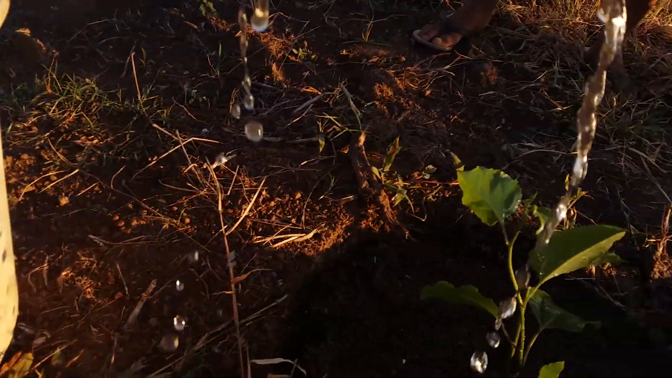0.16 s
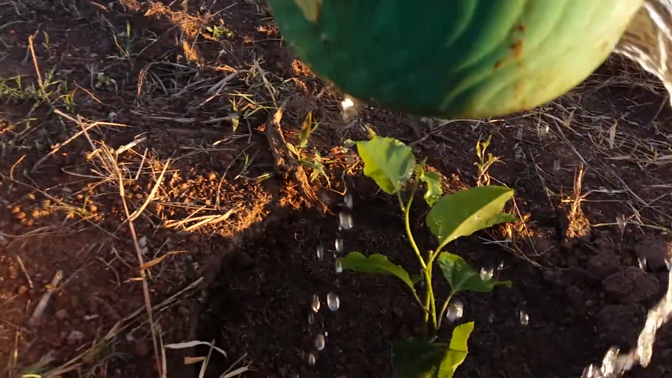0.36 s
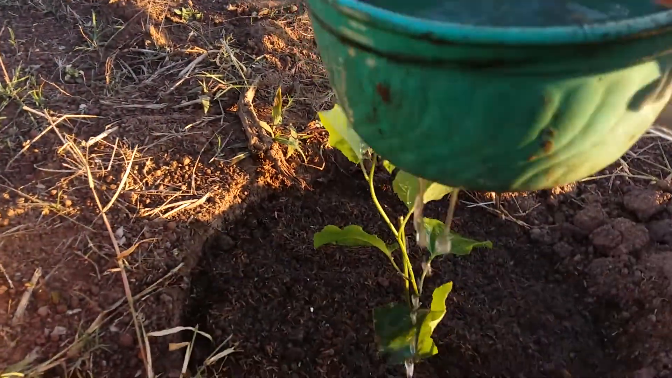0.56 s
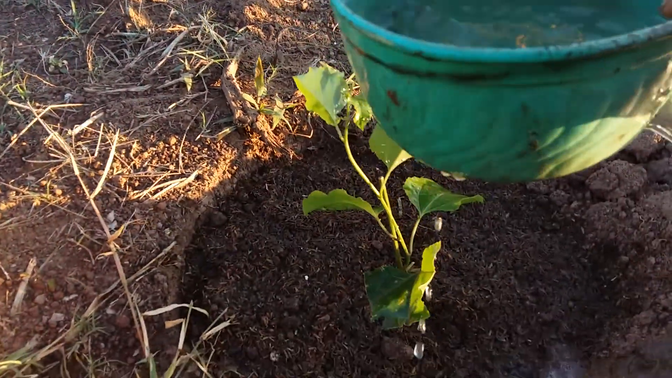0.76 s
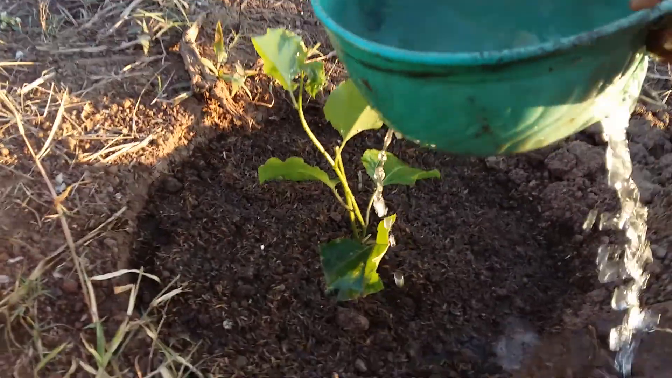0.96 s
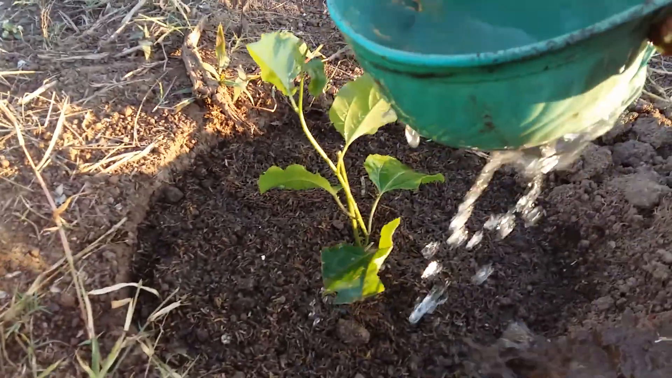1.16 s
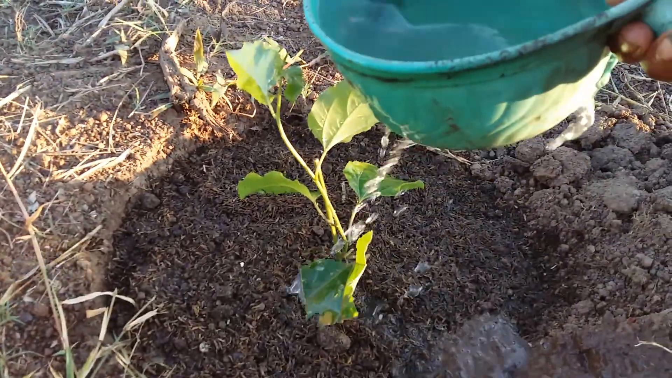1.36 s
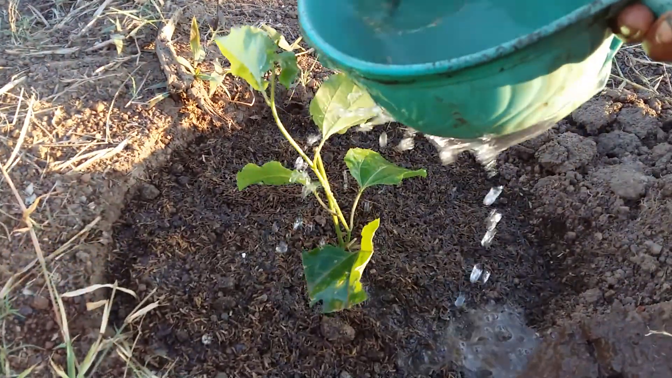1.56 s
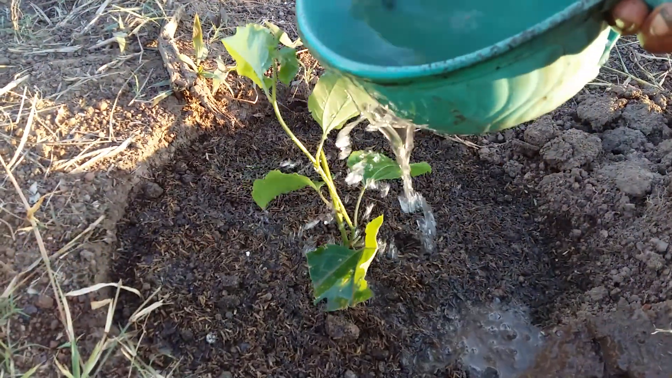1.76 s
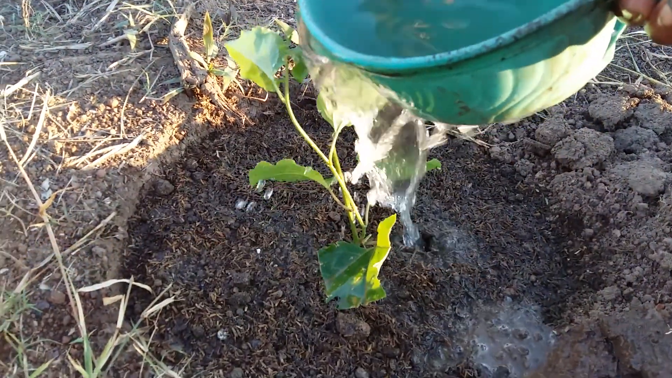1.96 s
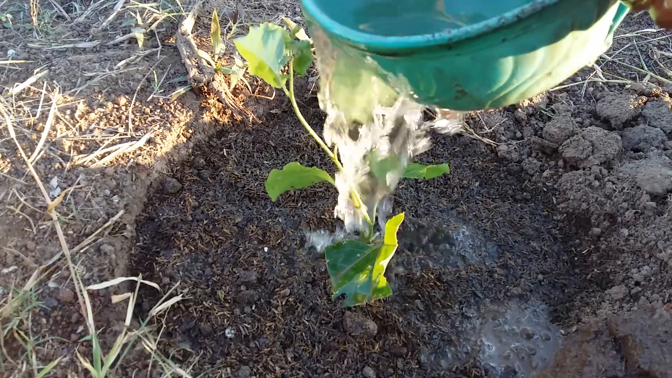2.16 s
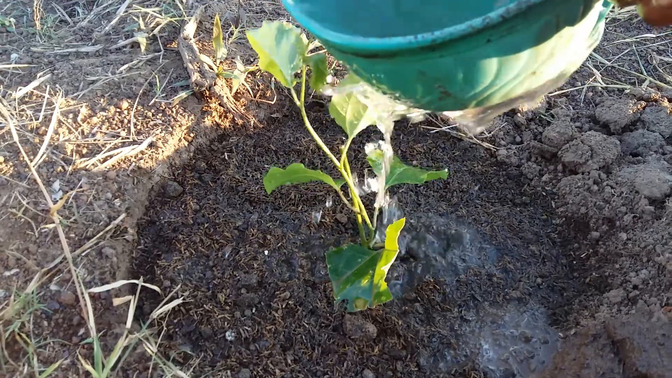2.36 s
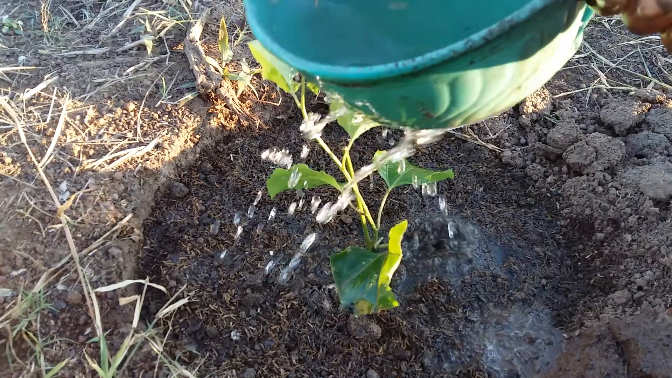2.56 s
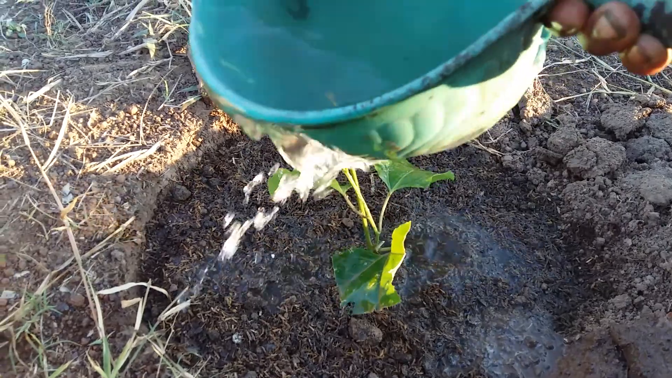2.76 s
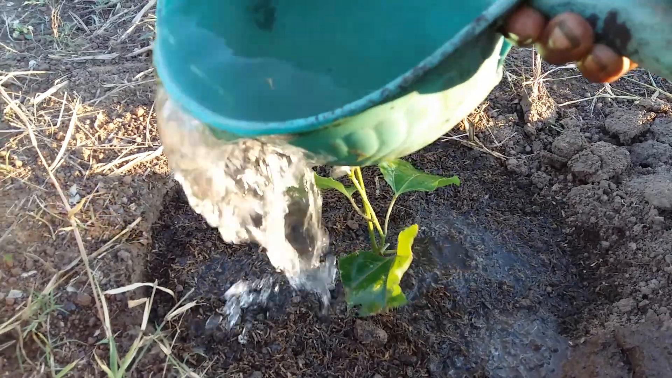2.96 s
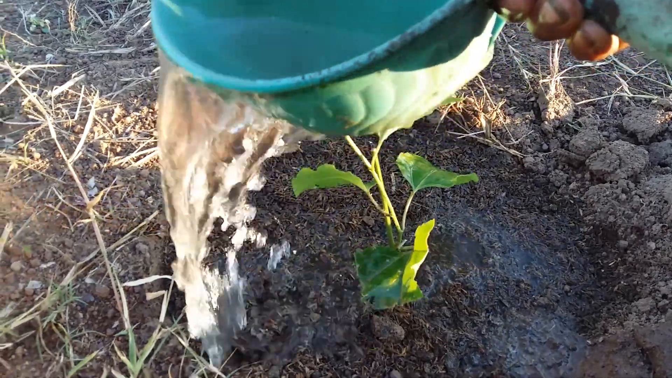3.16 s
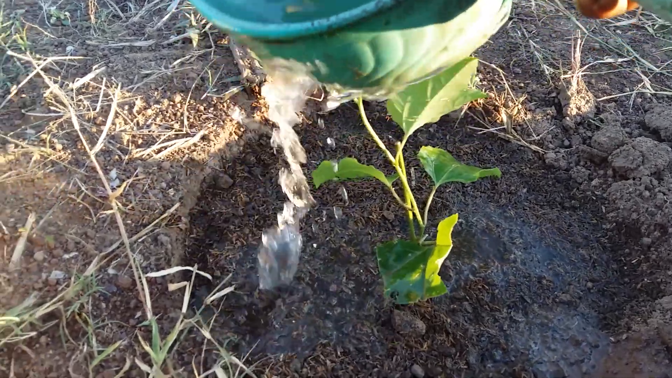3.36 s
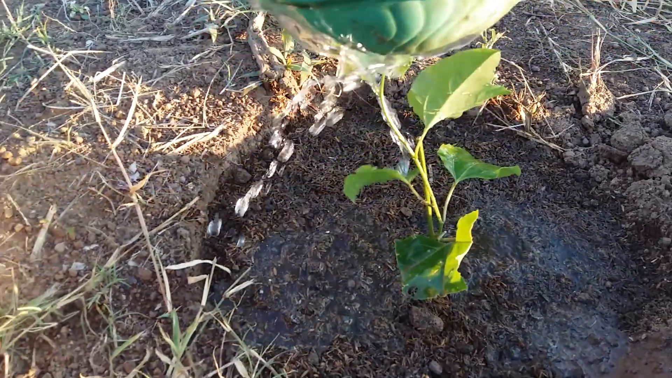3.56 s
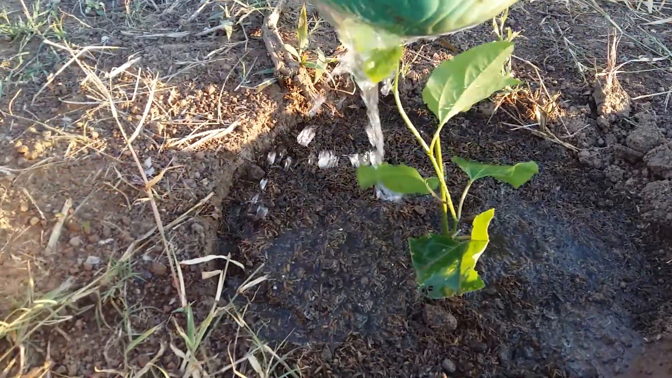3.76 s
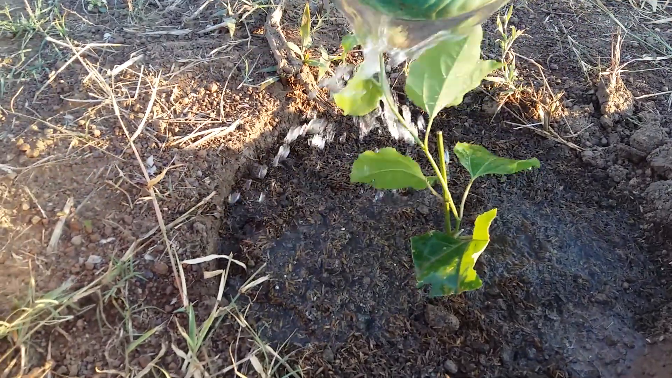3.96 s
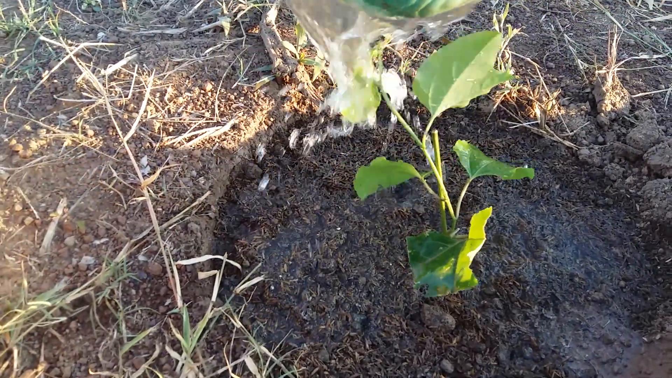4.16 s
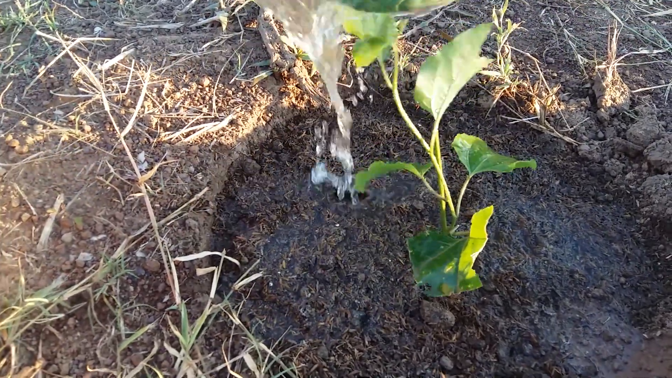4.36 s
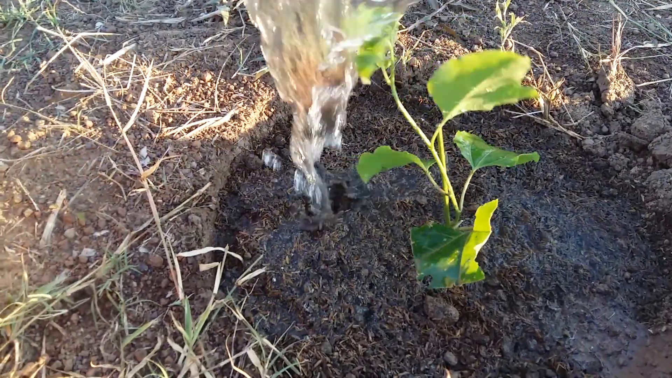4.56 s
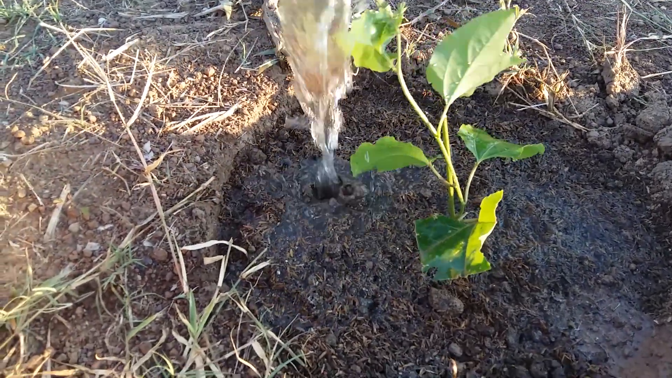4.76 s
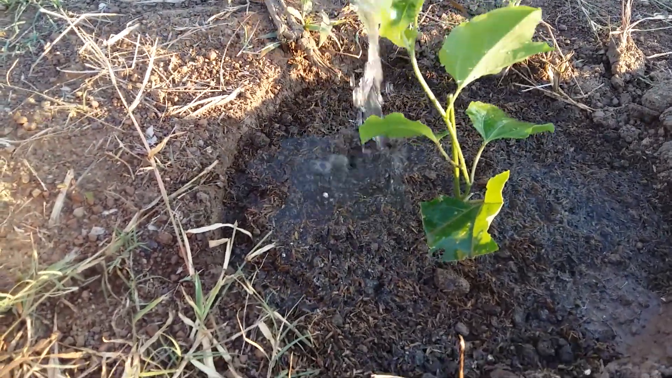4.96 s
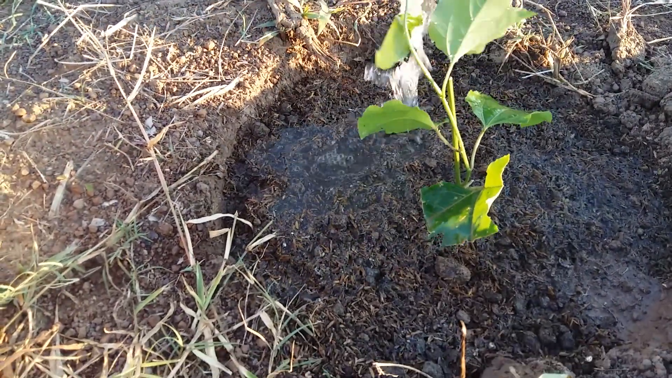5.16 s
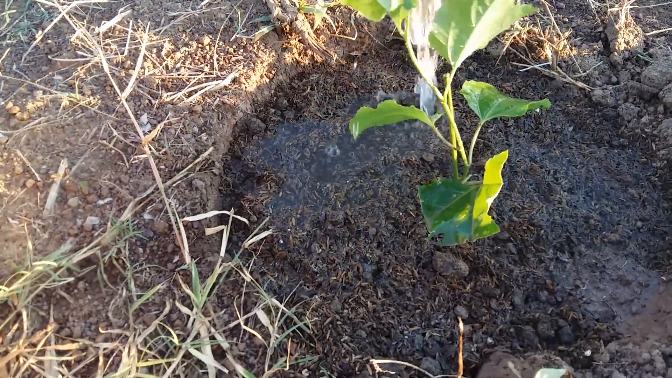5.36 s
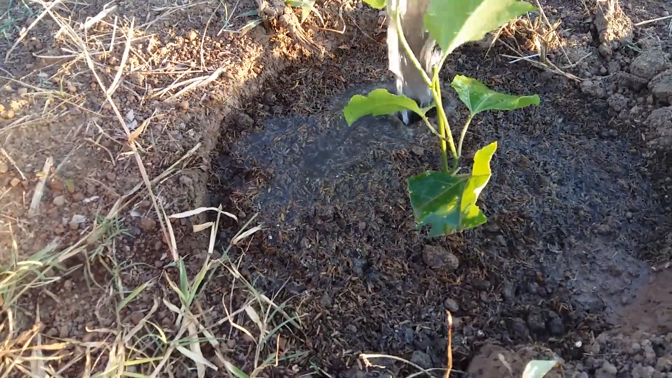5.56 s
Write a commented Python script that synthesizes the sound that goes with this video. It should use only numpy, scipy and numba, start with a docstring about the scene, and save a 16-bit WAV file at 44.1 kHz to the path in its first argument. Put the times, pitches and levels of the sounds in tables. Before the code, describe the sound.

Water is poured from a bowl onto loose garden soil, very close to a small stereo microphone that makes it crisp, bright and slightly ringing, mostly stronger on the left. For the first half second only separate drops tick and plip. At about 0.5 s a full surge splatters down with dense spray, easing after 1.1 s to a thin trickle and isolated drips until 1.8 s. A second pour builds from 1.85 to 2.6 s, then nearly stops around 2.9 s. Near 3 s a few short hollow gulps rise in pitch, leading into heavier splashing from 3.1 to 3.5 s. Drips and short spurts follow until 4.3 s, then fuller, livelier pouring runs from 4.4 s to the end at about 5.6 s, with sharp snaps, bubbly blips and dull pats. Faint far traffic rumble, a low machine drone, light hiss and a thin steady whine stay underneath, with little echo.

```python
"""A garden bed: water is tipped from a bowl onto loose soil in uneven surges, close to a camera's two microphone ports.
Far traffic rumbles and a machine drones, as filtered noise. Close by, the pour is built from short decaying rings:
drops tick on the wet earth, brief contacts and pitched bursts scatter, gulps rise, fine spray crackles between.
The ports ring near 6.5 kHz, the left one faces the water, and the electronics add a thin whine and hiss."""
import sys
import numpy as np
from scipy import signal
from scipy.fft import rfft, irfft, next_fast_len
from scipy.io import wavfile
from scipy.ndimage import uniform_filter1d
from numba import njit

SR = 44100
rng = np.random.default_rng(int(sys.argv[2]) if len(sys.argv) > 2 else 0)


def transcribe(signal):
    """Save signal, clipped to [-1, 1], as a 16-bit WAV file at the path in sys.argv[1]."""
    frames = np.atleast_2d(signal).T
    limited = np.clip(frames, -1, 1)
    pcm = np.round(limited * 32767).astype(np.int16)
    wavfile.write(sys.argv[1], SR, pcm)


N = 246959  # samples, 5.6 s


def undb(db):
    """Amplitude gain of a level in dB."""
    return 10 ** (np.asarray(db) / 20)


def level(x, db):
    """Scale x to an rms of db, taken over all its channels together."""
    return np.asarray(x) * undb(db) / np.sqrt(np.mean(np.square(x)))


def over_time(s, table):
    """Read a (seconds, value) table at times s, in straight lines between rows."""
    return np.interp(s, *np.transpose(table))


def colour(x, points):
    """Causal minimum-phase filter whose gain follows (Hz, dB) points."""
    hz, db = np.transpose(points)
    size = next_fast_len(N + SR)
    log_hz = np.log(np.fft.rfftfreq(size, 1 / SR) + 1)
    gain_db = np.interp(log_hz, np.log(hz), db)
    ceps = irfft(np.log(undb(gain_db)), size)
    # folding the cepstrum onto positive times makes the phase minimum
    ceps[1:size // 2] *= 2
    ceps[size // 2 + 1:] = 0
    return irfft(rfft(x, size) * np.exp(rfft(ceps)), size)[..., :N]


def walk(rate):
    """Random levels held 1 / rate s and slewed; spread a little under 1."""
    k = int(SR / rate)
    steps = np.repeat(rng.standard_normal(N // k + 1), k)
    return uniform_filter1d(steps, k)[:N]


# Spectrum of the far traffic. Each row: frequency in Hz, relative density in dB per Hz.
TRAFFIC_SPECTRUM = [(18, -29), (40, -20), (52, -9), (68, -2.5), (100, -2.5), (150, 1), (230, -3),
                    (300, -13.5), (500, -31), (900, -45.5), (1400, -44.5)]
TRAFFIC_DB = -54  # rms


def traffic():
    """Far traffic: low noise nearly the same at both ports, less so towards the top, slowly wavering."""
    mid, side = colour(rng.standard_normal((2, N)), TRAFFIC_SPECTRUM)
    side = undb(-10.0) * colour(side, [(30, 1), (60, -8), (100, -8), (250, 1.0), (700, 21.0)])
    waver = undb(1.43 * walk(2.29))
    return level(waver * np.array([mid + side, mid - side]), TRAFFIC_DB)


# Swell of the upper rumble. Each row: time in seconds, level in dB.
UPPER_SWELL = [(0, -54), (.2, -55), (.35, -61), (1.0, -60), (1.3, -67.5), (2.6, -63), (3.4, -60.5),
               (4.15, -66.5), (4.74, -58), (5.1, -64.5), (5.6, -59)]


def upper_rumble():
    """The upper rumble: a band of noise around 270 Hz that swells and sinks."""
    band = [(150, -45.0), (270, 4.0), (400, -4.5), (560, -13), (1200, -41.0)]  # Hz, dB
    mid, side = colour(rng.standard_normal((2, N)), band)
    swell_db = over_time(np.arange(N) / SR, UPPER_SWELL)
    return level([mid + 0.12 * side, mid - 0.43 * side], 0) * undb(swell_db)


# Drone of a far machine. Each row: frequency in Hz, bandwidth in Hz, rms level in dB.
MACHINE_HUM = [(85.1, 8.2, -60.5), (238.4, 14, -64.5), (511, 6, -77.5)]


def machine_hum():
    """A far machine drones: noise through narrow resonances, nearly the same at both ports."""
    out = np.zeros((2, N))
    for hz, width, db in MACHINE_HUM:
        resonance = signal.iirpeak(hz, hz / width, fs=SR)
        mid, side = signal.lfilter(*resonance, rng.standard_normal((2, N)))
        out = out + level([mid + 0.12 * side, mid - 0.11 * side], db)
    return out


@njit
def rings(n, start, lag, hz, cycles, glide, left, right):
    """Sines that swell within a cycle, die as a Gaussian and glide; the right port hears them lag samples later."""
    out = np.zeros((2, n + 64))
    for k in range(len(start)):
        span = cycles[k] * 44100. / hz[k]  # samples until the ring is 26 dB down
        for c in range(2):
            t0 = max(start[k] + c * lag[k], 0.)
            i0 = int(t0) + 1
            g = left[k] if c == 0 else right[k]
            for i in range(i0, min(i0 + int(1.6 * span) + 1, n)):
                u = (i - t0) / span
                turns = cycles[k] * u * (1 + .35 * glide[k] * u)
                out[c, i] += g * min(turns, 1.) * np.exp(-3 * u * u) * np.sin(2 * np.pi * turns)
    return out[:, :n]


# Where the stream lands. Each row: time in seconds, delay of the right port in ms.
LANDING_DELAY = [(0, 0.15), (.6, -.18), (1.0, -0.19), (1.3, -0.076), (2.4, -0.012), (2.7, 0.097),
                 (3.3, 0.15), (3.7, -0.04), (4.2, -0.031), (4.8, 0.051), (5.6, -0.075)]


def play(s, db, hz, cycles, glide, pan_db, scatter_ms=.025):
    """Rings scattered round the landing place, so each reaches the right port with its own lag."""
    one = np.ones(len(s))
    lag_ms = over_time(s, LANDING_DELAY) + scatter_ms * rng.standard_normal(len(s))
    left = undb(db + pan_db / 2) * one
    right = undb(db - pan_db / 2) * one
    cycles = np.maximum(cycles, .3) * one
    return rings(N, s * SR, lag_ms * SR / 1000, hz * one, cycles, glide * one, left, right)


# Surges of the stream, before the port response.
# Each row: time in seconds, level of the spray in dB, level of the small air pockets in dB re the spray.
SURGES = [(0, -35.5, -2), (.06, -46, 3), (.46, -44, -2), (.53, -24.5, -7), (.64, -24.5, -7),
          (.68, -23.5, 2), (1.09, -28, 0.5), (1.17, -34, -9), (1.32, -42, -9.5), (1.43, -42.5, -5.5),
          (1.55, -50, -8.5), (1.79, -44, -11.5), (1.85, -31, -12), (2.06, -33, 3), (2.15, -27.5, -5.5),
          (2.39, -25, 0), (2.5, -38.5, 9), (2.62, -38, -6), (2.7, -37, -4.5), (2.78, -40.5, -8),
          (2.89, -51, -10), (2.95, -46.5, 1), (2.98, -38.5, -1), (3.005, -35.5, 0.5), (3.06, -29.5, -0.5),
          (3.12, -34, 2.5), (3.18, -25, -1), (3.36, -27.5, -6.5), (3.48, -26, -8), (3.57, -38, -6.5),
          (3.65, -44, -2.5), (3.78, -40.5, -7.5), (3.89, -30, -9.5), (3.96, -29, -6.5), (4.048, -44, -1.5),
          (4.158, -32, -6.5), (4.22, -37, -3), (4.28, -45, -2.5), (4.33, -29, -2.5), (4.45, -33.5, -4),
          (4.62, -23.5, -6.5), (4.9, -25.5, 3), (5.05, -31.5, -2), (5.1, -32, -4), (5.25, -26.5, -5.5),
          (5.3, -30.5, 1), (5.35, -33, 4.5), (5.44, -29.5, 4.5), (5.6, -33, 2)]


def flow(s):
    """Levels in dB of the spray and of the small air pockets at times s."""
    t, spray_db, air_db = np.transpose(SURGES)
    return np.interp(s, t, spray_db), np.interp(s, t, spray_db + air_db)


def swarm(count, lo_hz, hi_hz, cycles, spread_db, clumps):
    """Many grains at chance moments, louder in clumps of bounded size; rms 1."""
    c = rng.random((count, 6)).T
    s = c[0] * N / SR
    db = -spread_db * np.log(1 - c[1]) + clumps[(c[0] * N).astype(int)]
    db = np.minimum(db, 11 * np.tanh(db / 11))  # no grain above 11 dB
    hz = lo_hz * (hi_hz / lo_hz) ** c[2]
    grains = play(s, db, hz, cycles * (.5 + c[3]), .5 * c[4], 19.0 * (c[5] - .5))
    return level(grains, 0)


# Large air pockets, stronger where a puddle stands. Each row: time in seconds, level in dB re the small ones.
PUDDLE_LEVEL = [(0, -0.5), (.45, 0), (.62, -6), (.72, -16.5), (.85, -15), (1.0, -9.5), (1.2, -4), (1.7, 8),
                (2.1, -12), (2.5, -10), (2.9, 8), (3.1, -10.5), (3.7, 0), (4.35, -8), (4.8, -11.5),
                (5.0, -5.5), (5.6, -5.5)]


def stream():
    """Spray and air pockets of two sizes; the broken stream lands in clumps that each size partly shares."""
    s = np.arange(N) / SR
    spray_db, small_db = flow(s)
    large_db = small_db + over_time(s, PUDDLE_LEVEL)
    clumps = 1.5 * walk(35) + 3.0 * walk(110) + 1.7 * walk(250)  # dB
    spray = swarm(count=22000, lo_hz=4240, hi_hz=17100, cycles=2.3, spread_db=2.0,
                  clumps=clumps + 3.3 * walk(60))
    small = swarm(count=8000, lo_hz=2033, hi_hz=5300, cycles=4.7, spread_db=1.0,
                  clumps=clumps + 1.7 * walk(60))
    large = swarm(count=6000, lo_hz=567, hi_hz=2300, cycles=3.95, spread_db=3.0,
                  clumps=1.7 * clumps + 4.4 * walk(40))
    return undb(spray_db) * spray + undb(small_db) * small + undb(large_db) * large


# lesser pitched bursts: how many, top level re the small air pockets, range below it, tilt
GURGLES, GURGLE_DB, GURGLE_RANGE_DB, GURGLE_DB_PER_OCTAVE = 340, 2, 10, 3.5


def gurgles():
    """Rows of lesser pitched bursts at chance moments; low ones are weaker and last for fewer cycles."""
    c = rng.random((GURGLES, 4)).T
    s = c[0] * N / SR
    octaves = 2.43 * c[1]  # above 900 Hz
    db = flow(s)[1] + GURGLE_DB + GURGLE_DB_PER_OCTAVE * octaves - GURGLE_RANGE_DB * c[3]
    cycles = (4.5 + 3.7 * octaves) * 2.0 ** c[2]
    return np.array([s, db, 900 * 2 ** octaves, cycles])


# Short pitched bursts in the pour, from a single knock to a ring of many cycles, before the port response.
# Each row: start in seconds, level in dB, pitch in Hz, length in cycles.
PITCHED_BURSTS = [(0.1514, -10, 3180, 1.7), (.3006, -16, 4350, 5.5), (0.357, -20, 1880, 5.2),
                  (.377, -16, 4600, 10), (.4, -0.5, 4000, 1.66), (0.4387, -21, 4530, 18),
                  (.638, -5, 4300, 2.9), (.6711, -5, 3580, 9.3), (.669, -13.5, 1540, 8.1),
                  (0.7143, -16.5, 1200, 10), (.736, -0.5, 1950, 8.6), (0.7716, -19.5, 1180, 10),
                  (0.814, -5, 2390, 5.7), (.8194, -12.5, 1380, 5.8), (0.8414, -14, 3490, 13),
                  (0.8428, -12.5, 1410, 5.7), (0.8777, -13.5, 1320, 4), (0.9114, -7, 1920, 3.5),
                  (.794, -10.5, 1880, 15), (0.8197, -6, 1960, 3.1), (.8774, -9, 3500, 15),
                  (.896, -8.5, 1250, 4.3), (0.9096, 0.5, 1230, 2), (0.9306, 3, 1160, 1.84),
                  (0.9676, -5, 4600, 7.2), (1.0897, 7, 3700, 1.5), (1.1496, -9.5, 1860, 8.3),
                  (1.2285, -13, 2230, 5.7), (1.378, -20.5, 2600, 7.5), (1.499, -15.5, 3220, 1.9),
                  (1.556, -22, 3800, 4.8), (1.6057, -4, 3600, 1.8), (1.6876, -6.5, 3800, 1.54),
                  (1.842, -12.5, 2970, 4), (1.896, -0.5, 2500, 2.5), (1.9277, -0.5, 2700, 2.2),
                  (2.021, -7.5, 4600, 6.1), (2.0822, -5, 3940, 3.9), (2.098, -4.5, 4330, 9.4),
                  (2.119, -6, 4020, 6.8), (2.1345, 4.5, 2650, 2.5), (2.151, -1.5, 3370, 4),
                  (2.233, -15, 3340, 16), (2.278, -4, 4700, 9.6), (2.3414, 0, 4500, 4.6),
                  (2.3653, 1, 2670, 9.1), (2.402, -7.5, 1140, 2.1), (2.4541, -4.5, 2640, 6.4),
                  (2.4715, -5, 4000, 6.9), (2.5225, -10.5, 2580, 6.9), (2.5517, 7.5, 3530, 2.8),
                  (2.5757, 6, 2540, 0.96), (2.5825, -7, 4270, 4.8), (2.6698, -19, 2660, 8.4),
                  (3.117, -4, 1210, 1.4), (3.1744, -4, 3600, 4.5), (3.291, -12, 2720, 6.4),
                  (3.392, -2.5, 2470, 1.5), (3.4157, -9.5, 2650, 7.8), (3.466, -9, 2370, 5.4),
                  (3.474, -14, 4580, 12), (3.5467, -1, 2660, 3.2), (3.6892, -14.5, 3020, 6.9),
                  (3.706, -10, 3540, 3.9), (3.727, -11.5, 3470, 6.3), (3.7442, -16.5, 2960, 6),
                  (3.9286, -3.5, 4290, 3), (3.9283, -14, 1200, 1.9), (4.1006, -3, 3740, 2.9),
                  (4.129, -7.5, 3600, 3.2), (4.212, -5.5, 1260, 1.44), (4.212, 2, 2570, 1.8),
                  (4.338, -3, 2850, 4.8), (4.3669, 5.5, 3650, 1.64), (4.485, -4, 3100, 2.8),
                  (4.529, -5, 4070, 3.6), (4.549, 6.5, 2520, 1.1), (4.592, -4.5, 3080, 3.2),
                  (4.599, 0, 3120, 3.3), (4.639, -2.5, 3100, 2.7), (4.686, -16, 4000, 7.4),
                  (4.7765, -8, 2780, 3), (4.788, 2.5, 3300, 2.8), (4.859, -12.5, 840, 3.5),
                  (4.923, -5, 2720, 20), (4.907, -4.5, 1380, 1.8), (4.946, -12, 2700, 20),
                  (4.975, -11.5, 1230, 2.9), (5.0038, -2, 3140, 3.1), (5.0179, -7.5, 2670, 5.4),
                  (5.0283, -20.5, 1290, 7.3), (5.3226, -8, 3900, 4.7), (5.348, -11, 1640, 5),
                  (5.351, -10, 2900, 25), (5.446, -11, 3300, 12), (5.589, -13.5, 1220, 4.3),
                  (5.0812, -6.5, 3420, 4.3), (5.1239, -6.5, 3420, 4.1), (5.191, -5, 3760, 8),
                  (5.212, -11.5, 740, 4.5), (5.213, -4, 1900, 1.4), (0.097, -13, 4300, 0.91),
                  (.043, -28, 3100, 15), (5.269, -10, 1420, 5.2), (5.2704, -2.5, 2800, 3.7),
                  (5.3473, -4.5, 3120, 6.2), (5.412, -0.5, 4300, 3.2), (5.4352, -0.5, 1090, 1.34),
                  (5.546, -3, 2250, 2.4), (.5374, -14.5, 2000, 5.3), (.702, -16, 3940, 7),
                  (0.7156, -9, 1870, 7.6), (.7271, -15, 1900, 6), (0.7455, -21, 1300, 3.7),
                  (.7591, -11, 4390, 7), (.7601, -16, 1500, 4.5), (.7941, -7, 4550, 7),
                  (0.8268, -8, 1880, 4.8), (.8666, -15, 3470, 6), (.9296, -9, 3970, 5.2),
                  (0.9704, -15, 1080, 4.4), (0.995, -15, 1900, 5.4), (1.886, -12, 4100, 7.7),
                  (1.981, -14, 4150, 12), (2.0884, -11, 2780, 6.4), (2.164, -17, 2430, 11),
                  (2.2953, -13, 3850, 10), (2.3145, -15, 2460, 5), (2.3809, -9, 3970, 8.5),
                  (2.5074, -12, 4380, 7.8), (3.0112, -13, 4260, 13), (3.047, -17, 2500, 4),
                  (3.0819, -10.5, 4700, 8.9), (3.0992, -19, 4330, 7), (3.1155, -11, 2330, 4.8),
                  (3.3744, -12, 3320, 6.8), (3.5356, -26, 4370, 5.5), (3.9704, -21, 3940, 6),
                  (4.3549, -14, 4480, 7), (4.4016, -18, 4000, 6), (4.4176, -18, 4440, 5),
                  (4.4582, -11, 2690, 5.2), (4.507, -17, 4270, 7.6), (4.6153, -11, 2950, 5),
                  (4.8426, -17, 4050, 6.5), (4.889, -12, 2900, 6), (4.968, -10.5, 2340, 6.1),
                  (4.9797, -12, 3940, 6), (5.068, -14, 3200, 3.7), (5.0999, -12, 4150, 6),
                  (5.1406, -10, 3050, 6), (5.2566, -17, 3510, 6), (5.3164, -10.5, 3000, 6.7),
                  (5.3391, -7.5, 3070, 8), (5.3349, -13, 1590, 6.1), (5.4075, -12, 1550, 5),
                  (5.4295, -20, 1320, 3.7), (5.4425, -11, 1720, 4.5), (5.5707, -16, 1630, 5),
                  (5.575, -12, 2920, 11)]
# neighbours of a burst: spread in time, level re the burst, spread in pitch
NEIGHBOUR_S, NEIGHBOUR_DB, NEIGHBOUR_OCTAVES = .012, -7.5, 0.71


def pitched_bursts():
    """Short decaying sines, from a knock to a ring of many cycles, each with three weaker neighbours."""
    s, db, hz, cycles = np.hstack([np.transpose(PITCHED_BURSTS), gurgles()])
    c = rng.random((len(s), 3, 3))
    beside_s = s[:, None] + NEIGHBOUR_S * (c[..., 0] - 0.3)
    beside_db = db[:, None] + NEIGHBOUR_DB - 3.5 * c[..., 1]
    beside_hz = hz[:, None] * 2 ** (NEIGHBOUR_OCTAVES * (c[..., 2] - 0.4))
    beside = play(beside_s.ravel(), beside_db.ravel(), beside_hz.ravel(), np.repeat(0.6 * cycles, 3), 0.19, 0)
    return play(s, db, hz, cycles, 0.052, 0) + beside


# Gulps of air, before the port response. Each row: start in seconds, level in dB, starting pitch in Hz,
# length in cycles of that pitch, glide (over the length the pitch rises by 0.7 times this share).
AIR_GULPS = [(2.958, -15, 730, 19, 0.58), (2.974, -16, 1110, 13.5, 1), (2.994, -14.5, 514, 15, 0.78),
             (3.022, -27, 860, 21, 0.4), (3.229, -30, 800, 36, 0.2), (2.931, -47, 4470, 150, .22),
             (2.972, -33, 5100, 150, .15)]
GULP_FLUTTER_DB = 1.2


def gulps():
    """Gulps of air close under the stream and rise in pitch, a little unsteady in level."""
    s, db, hz, cycles, glide = np.transpose(AIR_GULPS)
    return play(s, db, hz, cycles, glide, 0) * undb(GULP_FLUTTER_DB * walk(300))


# Short contacts, dull to bright, scattered through the pour, before the port response.
# Each row: start in seconds, level in dB, centre frequency in Hz.
SHORT_CONTACTS = [(0.0454, -25, 2300), (0.059, -28, 11900), (0.0983, -21, 4100), (0.1515, -10, 2320),
                  (0.1634, -28, 4100), (0.1634, -19, 9000), (0.208, -27, 11900), (0.246, -24, 5300),
                  (0.2846, -19.5, 3000), (0.2876, -26.5, 6800), (0.2902, -21, 2300), (0.3008, -16.5, 2300),
                  (0.3258, -28, 6800), (0.3496, -29, 6800), (0.357, -13, 4100), (0.4001, -25, 1000),
                  (0.4155, -19, 4100), (0.4204, -20, 6800), (0.4396, -15, 2290), (0.4899, -17, 1000),
                  (0.491, -9, 3000), (0.5035, -25, 11900), (0.5036, -20, 4100), (0.5039, -15, 1000),
                  (0.5223, -15, 2300), (0.528, -14, 1000), (0.5293, -12, 11900), (0.5443, -13, 4100),
                  (0.6391, -4, 3000), (0.6487, -13, 11900), (0.6599, -6, 4100), (0.6705, -14, 6800),
                  (0.6979, -8, 4100), (0.8201, -5.5, 4100), (0.8543, -8, 11900), (0.8778, -9, 11900),
                  (0.895, -4, 2300), (0.8991, -7.5, 4100), (1.015, -4, 2300), (1.0402, -10, 11900),
                  (1.0791, -6, 9000), (1.095, -22, 1000), (1.096, 1, 5300), (1.128, -8, 2300),
                  (1.1494, -15, 5300), (1.1778, -12, 9000), (1.1959, -11, 2310), (1.212, -18, 2300),
                  (1.212, -14, 11900), (1.2216, -15, 11900), (1.2598, -22, 2300), (1.2906, -28, 6800),
                  (1.3024, -25, 2300), (1.3067, -27, 6800), (1.333, -27, 6800), (1.338, -27, 6800),
                  (1.3442, -18, 2300), (1.3776, -25, 1000), (1.378, -14, 4100), (1.4026, -15, 11900),
                  (1.405, -29, 6800), (1.4241, -17, 11900), (1.4688, -34, 4100), (1.4691, -25, 11900),
                  (1.543, -25, 11900), (1.5613, -33, 6800), (1.6126, -30, 11900), (1.6679, -27, 2300),
                  (1.6864, -31, 1000), (1.7237, -33, 6800), (1.7668, -22, 4100), (1.7986, -27, 4100),
                  (1.8181, -25, 2300), (1.8227, -21, 9000), (1.8395, -10, 4100), (1.8422, -21, 6800),
                  (1.8865, -16, 2300), (1.8881, -22, 11900), (1.8957, -18, 11900), (1.927, -18, 4100),
                  (1.9319, -18, 1010), (1.9779, -4, 9000), (1.9876, -14, 1500), (2.02, -17, 1500),
                  (2.0287, -23, 1000), (2.0447, -15, 11900), (2.0886, -19, 6800), (2.0949, -17, 6800),
                  (2.1013, -27, 11900), (2.1226, -8, 4100), (2.1505, 1, 9000), (2.1776, -14, 6800),
                  (2.1821, -9, 4100), (2.1986, -9, 4100), (2.1988, -13, 11900), (2.2166, -15, 1000),
                  (2.2249, -17, 5300), (2.2341, -14, 11900), (2.2392, -13, 1500), (2.3319, -12, 1000),
                  (2.3321, -4, 11900), (2.366, 8, 4000), (2.39, -5, 3000), (2.3969, -7, 6800),
                  (2.3967, -10, 1000), (2.4282, -17, 1000), (2.4575, -6, 5300), (2.4842, -14, 11900),
                  (2.4959, -11, 2300), (2.5235, -15, 1000), (2.53, -9.5, 1010), (2.5883, -25, 1000),
                  (2.601, -29, 2300), (2.6351, -23, 4100), (2.6704, -27, 6800), (2.724, -22, 1000),
                  (2.7678, -33, 6800), (2.7976, -25, 11900), (2.9293, -31, 6800), (2.9707, -13, 4100),
                  (3.0111, -11, 2300), (3.026, -18, 4100), (3.087, -4, 9000), (3.0983, -11, 1500),
                  (3.0996, -19, 11900), (3.165, -12, 4100), (3.2521, -15, 1010), (3.2894, -10, 1500),
                  (3.3691, -12, 6800), (3.4335, -20, 11900), (3.4418, -26, 11900), (3.4531, -22, 1000),
                  (3.4576, -8, 1500), (3.473, -16, 1500), (3.5355, -17, 990), (3.5357, -11, 3000),
                  (3.5746, -23, 6800), (3.62, -25, 2300), (3.6214, -26, 11900), (3.628, -22, 11900),
                  (3.6635, -31, 4100), (3.6636, -23, 11900), (3.6776, -29, 1000), (3.6893, -27, 1000),
                  (3.6998, -27, 1500), (3.7067, -18, 9000), (3.7448, -7, 9000), (3.7737, -25, 1000),
                  (3.78, -17, 6800), (3.7943, -25, 4100), (3.8133, -13, 4100), (3.813, -21, 11900),
                  (3.8148, -20, 6800), (3.8381, -9, 3000), (3.8444, -12, 11900), (3.8447, -21, 2300),
                  (3.878, -16, 11900), (3.8939, -20, 11900), (3.9291, -5.5, 2300), (3.93, -12, 6800),
                  (3.9445, -16, 4600), (3.957, -15, 11900), (3.9707, -18, 9000), (3.9715, -20, 1500),
                  (4.0037, -19, 1500), (4.0094, -14, 6800), (4.011, -22, 11900), (4.0244, -23, 5300),
                  (4.025, -28, 1000), (4.0903, -24, 6800), (4.0939, -14, 11900), (4.0946, -17, 4100),
                  (4.0964, -20, 2300), (4.1513, -22, 2300), (4.1585, -10, 4100), (4.212, -13, 6800),
                  (4.2222, -23, 2300), (4.2244, -19, 6800), (4.2357, -18, 2300), (4.2842, -22, 4100),
                  (4.305, -13, 4100), (4.31, -14, 5300), (4.3155, -29, 2300), (4.3382, -15, 11900),
                  (4.3403, -18, 6800), (4.3465, -18, 11900), (4.3577, -16, 11900), (4.4177, -2, 4080),
                  (4.4575, -17.5, 980), (4.469, -11, 2300), (4.4812, -7, 9000), (4.5066, -10, 2300),
                  (4.5067, -18, 11900), (4.5374, -16, 6800), (4.544, -11, 1500), (4.55, -10, 6800),
                  (4.5732, -15, 1000), (4.6381, -15, 1000), (4.6398, -13, 11900), (4.675, -17, 980),
                  (4.6764, -13, 4100), (4.6809, -13, 6800), (4.688, -20, 2300), (4.6925, -10, 11900),
                  (4.7617, -10, 9000), (4.7927, -22, 1010), (4.7929, 3, 4130), (4.799, -19, 1010),
                  (4.798, -5, 11900), (4.8549, -19, 6800), (4.8865, -2, 2300), (4.8902, -9, 6800),
                  (4.8951, -6, 11900), (4.9088, -9, 6800), (4.9537, -10, 1000), (4.9945, -8, 11900),
                  (5.0042, -16, 6800), (5.0676, -19, 1000), (5.076, -14, 11900), (5.103, -12, 1020),
                  (5.1155, 8, 11900), (5.124, -13, 1000), (5.1528, -19, 11900), (5.1873, -1, 11900),
                  (5.2472, -15, 11900), (5.3228, 5, 11900), (5.379, -6, 4100), (5.5481, -17, 11900),
                  (5.5577, -14, 6800), (5.5717, -15, 11900)]
CONTACT_CYCLES, CONTACT_PAN_SCATTER_DB = 1.96, 2.5


def contacts():
    """Brief bursts of one to two cycles, each a little to one side."""
    s, db, hz = np.transpose(SHORT_CONTACTS)
    pan_db = CONTACT_PAN_SCATTER_DB * rng.standard_normal(len(s))
    return play(s, db, hz, CONTACT_CYCLES, 0, pan_db)


# lesser drops: how many, top level re the spray, range below it
PATTER, PATTER_DB, PATTER_RANGE_DB = 300, 11, 7


def patter():
    """Rows of lesser drops at chance moments, as strong as the flow allows."""
    c = rng.random((PATTER, 3)).T
    s = c[0] * N / SR
    db = flow(s)[0] + PATTER_DB - PATTER_RANGE_DB * c[1]
    return np.array([s, db, -14.0 + 13.0 * c[2]])


# Big drops striking the mud; each part of a drop sits at its own offset from these levels.
# Each row: start in seconds, drop level in dB, treble snap in dB re the drop.
BIG_DROPS = [(0.0987, -1, -1), (0.1052, -8, -9), (0.151, -5, 9), (0.2084, -25, 8), (.335, -17.5, 8),
             (0.347, -14, 1), (0.357, -6, -2), (0.3779, -12, 3), (0.401, -9, 8), (0.412, -10.5, 3),
             (0.4393, -11, 3), (0.458, -21, 18), (0.478, -14, 1), (0.4913, -7, 4), (0.503, -20, -1),
             (0.53, -5, 1), (0.545, -4.5, -2), (0.5624, 0, -8), (.587, 3, 2), (0.6184, 0, 1),
             (0.6397, 7, -17), (0.6573, 2, -9), (0.6767, 4.5, 3), (.701, -12, -12), (0.716, -3, -9),
             (0.731, -6, -10), (0.741, -9, 11), (0.7683, -10, -5), (0.8653, -11, 16), (.8788, -6, 9),
             (0.932, 2, 4), (.9443, -9, 10), (0.959, -13, 13.5), (0.967, -8, -6), (0.977, 0, 2),
             (1.018, -4.5, -17), (1.0694, 3.5, -5), (1.08, -3.5, -4), (1.0908, 0.5, -17), (1.106, -2, -5),
             (1.1272, -10, 13), (1.144, -5, -8), (1.163, -11, 8), (1.192, -6.5, -1), (1.21, -9, 7),
             (1.229, -6, -4), (1.2341, -3.5, -2), (1.2835, -20, -4), (1.422, -19, -5), (1.543, -17, 6),
             (1.736, -21, -5), (1.782, -24, 3), (1.275, -10.5, 8), (1.3323, -18, -8), (1.355, -15, 12),
             (1.389, -9, -2), (1.3995, -3.5, 4), (1.4998, -12.5, -11), (1.557, -12, -9),
             (1.6068, -11.5, 14.5), (1.6193, -12, -8), (1.6288, -9.5, -8), (1.667, -23, -8),
             (1.6874, -24, 15), (1.719, -21.5, 12), (1.7662, -16.5, -4), (1.8058, -10, 0), (1.8305, -3, -4),
             (1.896, -7.5, -10), (1.947, -2.5, -15), (1.9887, -3.5, -12), (2.021, 0, -20), (2.056, -7, 10),
             (2.082, -6, -4), (2.1077, -2.5, -7), (2.12, -6, 5), (2.1386, -1, -4), (2.16, 0.5, -8),
             (2.199, -4, 4), (2.233, -3.5, -3), (2.2793, 4, 3.5), (2.3238, 2.5, 0), (2.3419, 5, -1),
             (2.37, -10, 5), (2.4029, 1.5, -13), (2.48, 5, -18), (2.5067, -6, -5), (2.5152, -10, -9),
             (2.55, -8, -7), (2.585, -5.5, -23), (2.6008, -4, 8), (2.637, -8, -2), (2.686, -25, 8),
             (2.724, -13, 6), (2.813, -21, -5), (2.772, -23.5, 19), (2.824, -17, -14), (2.8645, -21, 5),
             (2.971, -9.5, -13), (3.011, -11.5, -14), (3.049, -6, -15), (3.0616, -10, -15),
             (3.069, -11, -17), (3.1805, 0, -5), (3.22, -2.5, -15), (3.252, 4.5, -18), (3.2882, -2, -8),
             (3.3139, 5, -18), (3.3421, 5, -19), (3.351, -5, -10), (3.366, -4, -12), (3.4164, -4, -14),
             (3.4746, -5, -12), (3.5201, -19, -3), (3.536, -14, 15.5), (3.5468, 0, 4), (3.633, -17, 11),
             (3.676, -8, 2), (3.69, -7, 14.5), (3.7275, -2, 2), (3.74, -7, -11), (3.7781, -9.5, 1),
             (3.809, -12.5, 3), (3.8447, -8, 11.5), (3.8972, -7, 3), (3.93, -2, -1), (3.962, -3, -7),
             (4.0045, -6, 1), (4.0784, -8.5, 10), (4.1007, -3, 2), (4.167, 1, -2), (4.2119, -2.5, 4),
             (4.246, -10.5, -11), (4.303, -8.5, 8), (4.3209, -8.5, 8), (4.367, 2.5, -3), (4.39, -2, 0),
             (4.4273, -7, 8), (4.468, -2.5, -3), (4.4892, -7, -8), (4.5306, 0, -6), (4.542, -5, 7),
             (4.6254, 3, -11), (4.6814, -21, 3), (4.703, 0, 6), (4.7548, -4, -10), (4.7925, 0.5, 12.5),
             (4.8952, -4, 8), (4.945, -0.5, -3), (5.027, -5.5, 13.5), (5.086, -4, -1), (5.1123, -5.5, 14),
             (5.157, -1.5, 2), (5.23, 3, 2), (5.268, 2.5, -4), (5.3163, -5.5, 15), (5.347, -4, 5.5),
             (5.371, -8, -9), (5.394, -8.5, -3), (5.408, -4, -7), (5.4453, -5.5, -1), (5.477, 2.5, -20),
             (5.4966, 5.5, -23), (5.5122, -4, -17), (5.552, -1, -21), (0.522, -12, -5), (1.005, -3, 2),
             (1.345, -14, -7), (1.821, -15, -5), (1.85, -7.5, -9), (1.9341, -6.5, -5), (2.0332, -6, -5),
             (2.1688, -5, -5), (2.5759, -19, -5), (2.75, -15.5, -5), (2.8003, -29, -5), (2.9085, -38, -5),
             (2.942, -22.5, -7), (3.021, -14, -9), (3.098, -19, -1), (3.1547, -9, 3), (3.295, -3, -5),
             (3.5057, -13, 4), (3.664, -13, -3), (3.7064, -18, -5), (3.878, -7, -5), (4.0326, -14, 5),
             (4.191, -21, -5), (4.4027, -4, -3), (4.418, -4, 2), (4.4577, -13, 0), (4.691, -19, -5),
             (4.7228, -17, -5), (4.9236, -12, -5), (4.9512, -0.5, 2), (4.9683, -3.5, -3), (4.994, -6.5, 12),
             (5.0776, -6.5, 4), (5.2775, -7, -5), (5.323, -10, -2), (5.522, -3, -12), (5.5571, 0, -5)]
# Pitch of the ticks, lower where the stream first lands far to the side. Each row: time in seconds, pitch in Hz.
DROP_PITCH = [(0, 6400), (.5, 6140), (.7, 5660), (1.1, 5650), (1.4, 6670), (2.2, 6430), (2.9, 6800),
              (3.5, 6570), (4.2, 6700), (5.6, 6500)]
TICK_SCATTER = 0.05  # share of the pitch
# left minus right: offset in dB, dB per ms of landing delay, random spread in dB
PAN_DB, PAN_DB_PER_MS, PAN_SCATTER_DB = -0.5, 16, 2.5


def drops(count=10):
    """A tick with a bright snap and a dull pat, amid droplets that land just before and, more of them, just after."""
    s, db, snap_db = np.hstack([np.transpose(BIG_DROPS), patter()])
    g = rng.standard_normal((len(s), 2)).T
    hz = over_time(s, DROP_PITCH) * (1 + TICK_SCATTER * g[0])
    pan_db = PAN_DB + PAN_DB_PER_MS * over_time(s, LANDING_DELAY) + PAN_SCATTER_DB * g[1]
    tick = play(s, db - 3.0, hz, 4.0, 0, pan_db)

    c = rng.random((len(s), count, 3))
    side_of_tick = np.where(np.arange(count) % 3 == 0, -0.35, 1)  # every third comes before
    after = -0.0022 * np.log(1 - c[..., 0]) * side_of_tick  # seconds
    droplet_s = s[:, None] + after
    droplet_db = db[:, None] - 2.0 - 900 * abs(after) - 2.8 * c[..., 1]
    droplet_hz = 3400 * 2.7 ** c[..., 2]
    droplets = play(droplet_s.ravel(), droplet_db.ravel(), droplet_hz.ravel(), 1.425, 0, np.repeat(pan_db, count))

    # the snap is a tight burst of four tiny beads
    bead_s = s[:, None] + 0.00256 * (c[:, :4, 2] - 0.6)
    bead_hz = 9300 * 1.48 ** c[:, :4, 1]
    bead_db = np.repeat(db + snap_db - 6.0, 4)
    snap = play(bead_s.ravel(), bead_db, bead_hz.ravel(), 2.47, 0, np.repeat(pan_db, 4))

    pat_hz = 600 * 2.9 ** rng.random(len(s))
    pat = play(s, db - 16.0, pat_hz, 0.67, 0, pan_db)
    return tick + snap + pat + droplets


SCATTER_DB, SCATTER_T60_S = -15, .03  # echoes off clods, leaves and the bowl


def scatter(x):
    """Nearby surfaces smear every close sound with a brief diffuse tail."""
    t = np.arange(2048) / SR
    tail = rng.standard_normal(len(t)) * 1000. ** (-t / SCATTER_T60_S)
    tail = undb(SCATTER_DB) * tail / np.sqrt(np.sum(tail ** 2))
    return x + signal.fftconvolve(x, tail[None], axes=1)[:, :N]


# Response of the microphone ports. Each row: frequency in Hz, gain in dB.
PORT_RESPONSE = [(200, -32.5), (450, -20.5), (1000, -18.5), (2100, -14.5), (2800, -14), (4800, -11),
                 (5700, -8), (6500, -1), (7300, -7), (9000, -15), (12500, -24.5), (16000, -22.5)]
# The left port faces the water. Each row: frequency in Hz, left minus right in dB.
PORT_FACING = [(500, 1), (800, -3), (1300, 6), (2400, 7.5), (4400, 6), (8000, 8), (12000, 0.5)]


def ports(x):
    """Both ports ring near 6.5 kHz; their difference is split evenly between left and right."""
    x = colour(x, PORT_RESPONSE)
    hz, db = np.transpose(PORT_FACING)
    left = colour(x[0], np.transpose([hz, db / 2]))
    right = colour(x[1], np.transpose([hz, -db / 2]))
    return np.array([left, right])


def scene():
    """The far background, with the pour close to the ports."""
    background = traffic() + upper_rumble() + machine_hum()
    water = stream() + pitched_bursts() + gulps() + contacts() + drops()
    return background + ports(scatter(water))


WHINE_HZ, WHINE_DB, HISS_DB, TOP_HZ = 12004, -73, -68, 15900  # levels are rms


def record(dry):
    """The electronics add a thin, slightly wavering whine and a little hiss, and cut the top."""
    whine_hz = WHINE_HZ + 4.4 * walk(14)
    whine = np.sqrt(2) * undb(WHINE_DB) * np.sin(2 * np.pi * np.cumsum(whine_hz) / SR)
    hiss = undb(HISS_DB) * rng.standard_normal(dry.shape)
    top_cut = signal.ellip(8, .2, 60, TOP_HZ, fs=SR, output="sos")
    return signal.sosfilt(top_cut, dry + whine + hiss)


dry = scene()
out = record(dry)
transcribe(out)
```